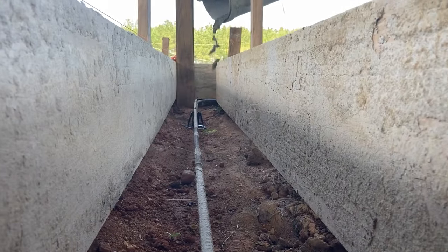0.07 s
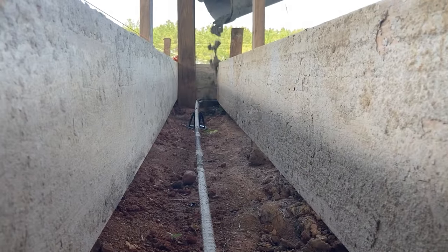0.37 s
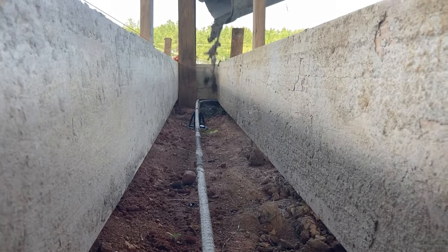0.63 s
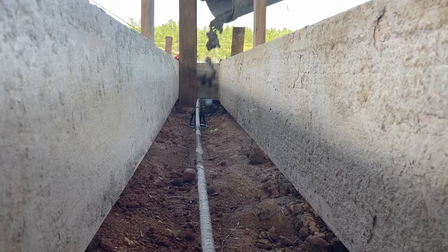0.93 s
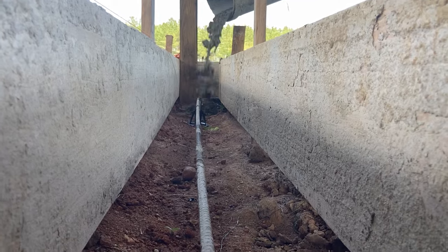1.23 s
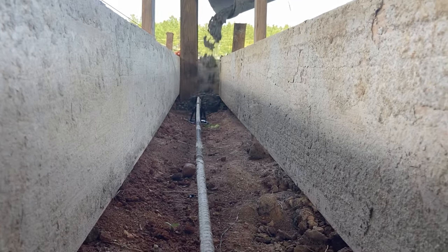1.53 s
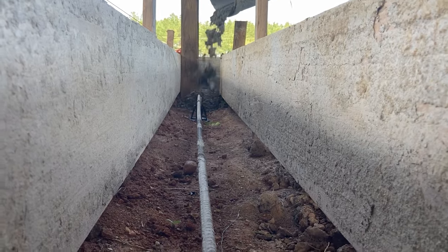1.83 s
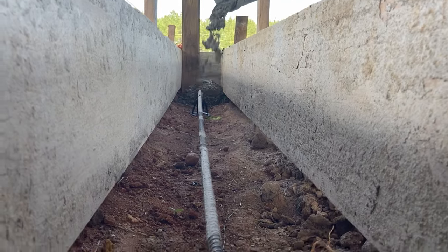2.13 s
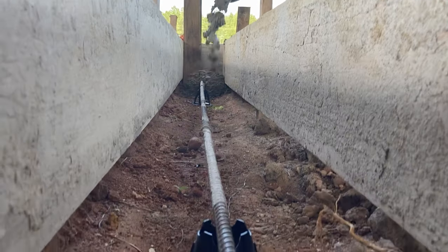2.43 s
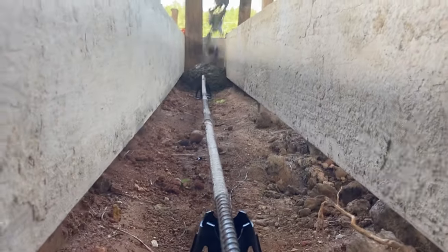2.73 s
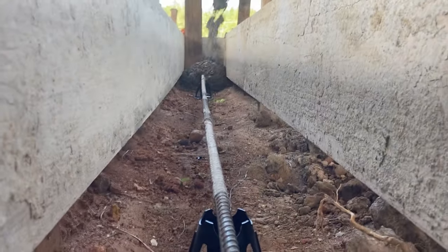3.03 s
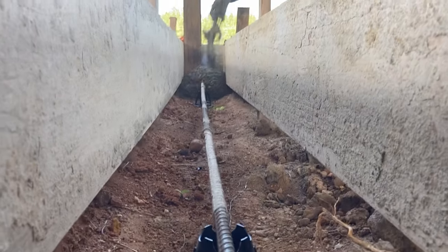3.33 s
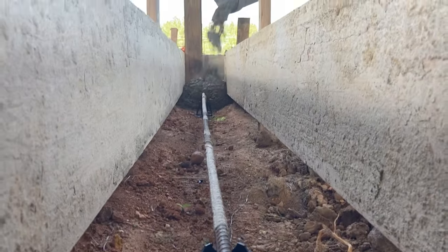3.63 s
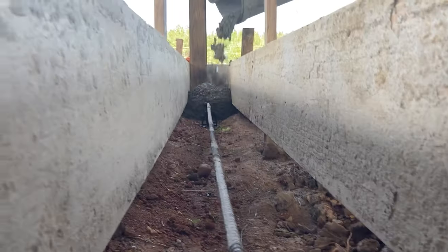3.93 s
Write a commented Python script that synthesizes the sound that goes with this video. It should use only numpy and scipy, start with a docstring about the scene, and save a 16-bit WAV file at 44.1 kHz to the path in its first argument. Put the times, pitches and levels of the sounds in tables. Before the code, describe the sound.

Lumps of wet concrete land with gritty splats over a steady diesel engine hum.

```python
"""Wet concrete drops from a chute into a narrow trench, a few metres from a phone held low in it.
From the start, two diesel engines drone nearby and the first big clods land with dull plops.
After half a second, lump follows lump, each a burst of gritty clicks and popping air pockets.
From one second on, stones now and then ring a steel rod.
Near the end come low thumps and rumble as the phone is handled and moved through the air."""
import sys
import numpy as np
from scipy import signal
from scipy.fft import rfft, irfft
from scipy.io import wavfile
from scipy.ndimage import uniform_filter1d

SR = 44100
rng = np.random.default_rng(int(sys.argv[2]) if len(sys.argv) > 2 else 0)


def master_out(mix):
    """Clip the mix to full scale and print it as 16-bit PCM to the path in sys.argv[1]."""
    frames = np.transpose(np.atleast_2d(mix))
    ceiling = np.clip(frames, -1, 1)
    pcm = np.round(ceiling * 32767).astype(np.int16)
    wavfile.write(sys.argv[1], SR, pcm)


N = 176400  # 4 seconds

# Lumps landing: t/s, level/dB, length/s
LUMPS = [(0.53, -36.5, 0.021), (0.58, -32, 0.01), (0.666, -34, 0.013), (0.75, -30, 0.016),
         (0.797, -35, 0.041), (0.904, -31, 0.025), (0.979, -30.5, 0.01), (1.029, -28.5, 0.056),
         (1.13, -30.5, 0.018), (1.149, -24.5, 0.013), (1.205, -31.5, 0.033), (1.272, -29.5, 0.036),
         (1.345, -26.5, 0.045), (1.426, -27.5, 0.01), (1.444, -27.5, 0.012), (1.505, -28, 0.028),
         (1.547, -31.5, 0.011), (1.587, -29, 0.0079), (1.654, -21.5, 0.0053), (1.701, -27, 0.0069),
         (1.743, -30.5, 0.042), (1.795, -27.5, 0.016), (1.862, -32, 0.013), (1.902, -26, 0.037),
         (2.026, -22.5, 0.0054), (2.095, -30.5, 0.02), (2.131, -32.5, 0.012), (2.162, -28, 0.023),
         (2.269, -29, 0.025), (2.352, -28, 0.012), (2.425, -29.5, 0.039), (2.507, -32, 0.021),
         (2.551, -30.5, 0.051), (2.615, -28, 0.025), (2.737, -26, 0.013), (2.767, -28.5, 0.011),
         (2.817, -24.5, 0.005), (2.856, -28.5, 0.0072), (2.893, -24.5, 0.012), (2.97, -24, 0.013),
         (3.027, -29.5, 0.018), (3.071, -23.5, 0.014), (3.123, -24.5, 0.009), (3.157, -26.5, 0.027),
         (3.242, -29, 0.024), (3.283, -27.5, 0.027), (3.38, -28, 0.033), (3.414, -29.5, 0.011),
         (3.465, -21.5, 0.011), (3.519, -29, 0.013), (3.544, -30, 0.021), (3.577, -32, 0.049),
         (3.613, -31.5, 0.017), (3.642, -30, 0.026), (3.681, -31.5, 0.015), (3.774, -26.5, 0.021),
         (3.865, -27, 0.011), (3.917, -30, 0.0093), (3.98, -32, 0.019)]
# Fine spatter between the lumps: t/s, level/dB
SPATTER = [(0, -44), (.5, -40.5), (1, -40), (1.5, -37), (2.3, -37.5), (2.6, -38), (3.6, -37), (4, -37.5)]


def flow(attack_s=0.005, release_s=0.0098, lump_boost_db=0.2):
    """How loud the landing concrete is at each moment: lumps stand out over fine spatter."""
    t = np.arange(N) / SR
    power = undb(curve(SPATTER)) ** 2
    for start, db, length in LUMPS:
        rise = np.clip((t - start) / attack_s + .5, 0, 1)
        fall = np.exp(-np.maximum(t - start - length / 2, 0) / (release_s + length / 2))
        power += (undb(db + lump_boost_db) * rise * fall) ** 2
    return np.sqrt(power)


def grit(per_s, spread_db=3):
    """Grains hit at random moments, making clicks of very uneven size."""
    sizes = undb(spread_db * np.minimum(rng.exponential(size=N), 4.5)) * rng.choice([-1, 1], N)
    return unit(sizes * (rng.random(N) < per_s / SR))


# Tone of the grit, heard directly and off the walls: f/Hz, relative level/dB
DIRECT_TONE = [(300, -39), (1000, -9), (3000, -6), (5500, -5.5), (7500, -1), (9000, 2), (10300, 1),
               (12000, -3), (15500, -9)]
ECHO_TONE = [(200, -13.5), (500, -5), (1000, -3.5), (2000, -3.5), (3400, 6.5), (5000, 3), (7500, -3.5),
             (9200, -44), (11500, 0.5), (15500, -22)]
# How much louder the wall echoes are on the left: f/Hz, left minus right/dB
ECHO_BALANCE = [(300, 20), (1000, -2), (3000, 2), (4500, 0), (15000, 0.5)]


def concrete(landing, spot_count=10, grains_per_s=22000):
    """Grit clicks down at many spots, each with its own quick echo between the trench walls."""
    t = np.arange(SR // 16) / SR
    # each spot's share of the flow swells and fades by itself
    shares = undb(6.5 * np.array([wander(per_s=16) for _ in range(spot_count)]))
    shares /= np.sqrt(np.sum(shares ** 2, axis=0))
    spots = np.array([grit(grains_per_s / spot_count) * landing * share for share in shares])
    walls = np.zeros((2, N))
    for spot in spots:
        echo = rng.standard_normal((2, len(t))) * fade(t, t60=0.026)
        walls += signal.oaconvolve(np.array([spot, spot]), echo, axes=1)[:, :N]
    lean = np.sqrt(gains(ECHO_BALANCE))
    walls = colour(irfft(rfft(walls) * np.array([lean, 1 / lean]), N), ECHO_TONE)
    direct = colour(spots.sum(axis=0), DIRECT_TONE)
    # the left microphone hears the grit later, with the wave upside down
    left = -delay(direct, lag_s=.000218)
    heard = undb(-2.5) * np.array([left, direct]) + undb(-3) * walls
    level = np.sqrt(np.mean(landing ** 2) * np.mean(heard ** 2))
    return patchy(heard) * level


def patchy(x, bands=22, swell_db=1.5):
    """Low and high bands swell on their own, so no two lumps sound alike."""
    place = np.interp(log_frequencies(), np.log([700, 14000]), [0, bands - 1])
    spectrum = rfft(x)
    parts = (irfft(spectrum * np.maximum(1 - abs(place - k), 0), N) for k in range(bands))
    return unit(sum(part * undb(swell_db * wander(per_s=35)) for part in parts))


# Big clods landing: t/s, level/dB, f/Hz, relative slap level/dB, delay on the left/s
CLODS = [(.1125, -15, 500, -19, 0.0036), (.2565, -27.5, 620, 5, -0.0015), (.2725, -13.5, 507, -16, -0.0007),
         (.296, -28.5, 470, -10, 0.0042), (.385, -26, 550, -9, -0.00065), (1.52, -25.5, 704, -11, -0.0016),
         (1.725, -27.5, 684, -11, -0.00073), (2.032, -24, 422, -3, -0.00074),
         (2.173, -27.5, 426, -14, .0003), (2.46, -25.5, 720, -15, -0.0002), (2.511, -18, 650, -9.5, 0.0023),
         (2.739, -27, 427, -14, .0004), (2.973, -26, 374, -12, 0.00066), (3.864, -28, 403, -10, 0.0026)]
# Hollow ring of the trench bottom: multiple of the clod's pitch, relative level/dB, fade time/s
HOLLOW = [(1, 4.5, 0.018), (1.04, -17.5, 0.12)]


def clods(slap_hz=1460, slap_width_hz=590, attack_s=0.0015, sag_s=0.002, boost_db=0.5):
    """Heavy clods land with a short plop and a wet slap on top; the walls scatter both."""
    out = np.zeros((2, N))
    t = np.arange(SR // 4) / SR
    edges_hz = [slap_hz - slap_width_hz / 2, slap_hz + slap_width_hz / 2]
    band = signal.butter(4, edges_hz, "band", fs=SR, output="sos")
    sagging = t + 0.56 * sag_s * (1 - np.exp(-t / sag_s))  # the pitch starts 56% high, then drops
    swell = 1 - np.exp(-(t / attack_s) ** 2)
    for start, db, hz, slap_db, lag_s in CLODS:
        plop = sum(undb(ring_db) * np.sin(2 * np.pi * hz * multiple * sagging) * fade(t, t60)
                   for multiple, ring_db, t60 in HOLLOW)
        slap = unit(signal.sosfilt(band, rng.standard_normal(len(t)))) * fade(t, t60=0.044)
        hit = undb(db + boost_db) * (plop + undb(slap_db) * slap) * swell
        echo = rng.standard_normal((2, len(t))) * t * fade(t, t60=0.053)
        walls = signal.fftconvolve(hit[None], echo / np.linalg.norm(echo), axes=1)[:, :len(t)]
        heard = np.array([delay(hit, lag_s), hit]) + undb(-4.5) * walls
        i = int(start * SR)
        out[:, i:i + len(t)] += heard[:, :N - i]
    return out * pan(db=2.5)


# Stones hitting the steel rod: t/s, click level/dB, ring level/dB
STONES = [(1.027, -13.5, -31.5), (1.13, -19, -30.5), (1.355, -29, -38), (1.654, -26, -54),
          (1.907, -21, -48), (2.028, -39, -40), (2.817, -25, -54), (3.127, -23, -54), (3.864, -25, -51)]
# The rod's ringing notes, in two matching lists: f/Hz and relative level/dB
ROD_HZ = [3523, 4699, 6282, 7332, 8330, 9670, 11594]
ROD_DB = [-13, -2.5, -11, -4, -7, -15, -10]


def rod(landing, patter_db=-50.5):
    """Stones click on a steel rod, and the grit behind them rattles it into a rough ring."""
    t = np.arange(SR) / SR
    notes = sum(undb(db) * np.sin(2 * np.pi * (hz * t + rng.random() + 0.14 * rng.random((2, 1))))
                for hz, db in zip(ROD_HZ, ROD_DB))
    ring = notes * fade(t, t60=0.27)
    out = np.zeros((2, N + SR))
    patter = grit(per_s=300) * landing  # keeps the rod ringing faintly
    out[:, :N] = undb(patter_db) * unit(signal.fftconvolve(patter[None], ring, axes=1)[:, :N])
    bright = signal.butter(2, 4000, "high", fs=SR, output="sos")
    for start, click_db, ring_db in STONES:
        click = signal.sosfilt(bright, rng.standard_normal((2, SR))) * fade(t, t60=0.012)
        rattle = rng.standard_normal(SR) * fade(t, t60=0.13)
        rough_ring = signal.fftconvolve(rattle[None] / np.linalg.norm(rattle), ring, axes=1)[:, :SR]
        i = int(start * SR)
        out[:, i:i + SR] += undb(click_db) * click + undb(ring_db) * rough_ring
    return out[:, :N]


# Squelch of bursting air pockets: t/s, level/dB
SQUELCH = [(0, -46), (1, -48), (1.6, -48.5), (2.3, -48), (2.6, -42), (3.2, -50), (3.6, -54), (4, -80)]


def squelch(landing, pockets_per_s=450, middle_hz=2684, pitch_rise=0.11):
    """Tiny air pockets burst with a short rising note, harder under each lump."""
    out = np.zeros((2, N + SR))
    for when, pitch, size, *phases in rng.random((int(pockets_per_s * N / SR), 5)):
        hz = middle_hz * 2 ** (0.494 * np.arcsin(2 * pitch - 1))
        life_s = 44 / hz  # about 44 vibrations
        t = np.arange(int(life_s * SR)) / SR
        cycles = hz * t * (1 + pitch_rise * t / life_s / 2) + np.array(phases)[:, None]
        i = int(when * N)
        out[:, i:i + len(t)] += undb(16 * size) * np.sin(2 * np.pi * cycles) * fade(t, life_s)
    return unit(out[:, :N] * np.sqrt(landing)) * undb(curve(SQUELCH)) * pan(db=5.0)


# Four-cylinder engine under changing load: t/s, speed/(turns per s), boost of its upper hum/dB
ENGINE_LOAD = [(0.0, 32.8, -1), (1.2, 32.8, .5), (1.9, 32, -1), (2.45, 33, 2), (3.05, 33.25, -1.8),
               (3.7, 32.7, -1.5), (4.0, 32.4, -0.5)]
# Each engine's exhaust notes, in two matching lists: multiple of the cycle rate and level/dB
FOUR_MULTIPLES = [4, 5, 6, 8, 9, 10, 11, 14, 16, 20]
FOUR_DB = [-40.5, -50, -60, -39, -44.5, -43.5, -49, -38.5, -39, -53.5]
SIX_MULTIPLES = [4, 5, 6, 8, 12, 36]
SIX_DB = [-46, -48, -41, -51, -46, -57.5]
# Rumble of burning fuel and clatter of moving parts: f/Hz, relative level/dB
RUMBLE_TONE = [(22, -55), (32, -25), (45, -5.5), (65, -6.5), (140, -5.5), (190, -8.5), (300, -6.5),
               (420, -13), (700, -24), (1500, -58)]
CLATTER_TONE = [(200, -6), (400, -5.5), (620, 2.5), (950, -0.5), (1600, 3), (2400, -1), (3500, -0.5),
                (5500, -5), (8000, -12), (11000, -57), (15500, -36)]


def engines(six_firing_hz=104.92, rumble_db=-40.5, clatter_db=-38):
    """A four- and a six-cylinder diesel hum over rumble; their clatter pulses as the cylinders fire."""
    speed, load_db = curve(ENGINE_LOAD), curve(ENGINE_LOAD, column=2)
    four, four_cycles = exhaust(speed / 2, FOUR_MULTIPLES, FOUR_DB, load_db)  # two turns per cycle
    six, six_cycles = exhaust(six_firing_hz / 6, SIX_MULTIPLES, SIX_DB)
    firing = np.cos(2 * np.pi * 4 * four_cycles) + np.cos(2 * np.pi * 6 * six_cycles)
    clatter = colour(rng.standard_normal((2, N)) * np.exp(0.038 * firing), CLATTER_TONE)
    rumble = colour(rng.standard_normal(N) + undb(-12) * rng.standard_normal((2, N)), RUMBLE_TONE)
    hum = four * pan(db=1.7) + six * pan(db=-2.5)
    return hum + undb(rumble_db) * rumble + undb(clatter_db) * clatter * pan(db=1.5)


def exhaust(cycle_hz, multiples, levels_db, load_db=0, flutter_db=0.37):
    """Gives an exhaust's wavering hum, whose upper notes swell with load, and its count of cycles."""
    cycles = np.cumsum(cycle_hz * (1 + 0.00095 * wander(per_s=4.96))) / SR
    hum = np.zeros(N)
    for multiple, db in zip(multiples, levels_db):
        level = undb(db + load_db * (multiple >= 14) + flutter_db * wander(per_s=8.84))
        hum += level * np.sin(2 * np.pi * (multiple * cycles + rng.random()))
    return np.sqrt(2) * hum, cycles


# Strength of the handling thumps: t/s, level/dB
THUMPS = [(0, -50), (2.8, -58), (3.12, -38), (3.35, -52), (3.44, -42), (3.49, -31), (3.7, -33), (3.82, -34),
          (4, -50)]
# Their deep tone: f/Hz, relative level/dB
THUMP_TONE = [(24, -42), (35, -11), (48, 1), (60, -7), (90, -18), (200, -29), (500, -71)]


def handling():
    """Low thumps and rumble from the phone being handled and moved through the air."""
    return colour(rng.standard_normal(N), THUMP_TONE) * undb(curve(THUMPS))


def undb(db):
    """Turn decibels into a number to multiply by."""
    return 10 ** (np.asarray(db) / 20)


def unit(x):
    """Scale to an average (rms) level of 1."""
    return x / np.sqrt(np.mean(x ** 2))


def curve(table, column=1):
    """Join a table's points in time with straight lines."""
    points = np.array(table, float)
    return np.interp(np.arange(N) / SR, points[:, 0], points[:, column])


def log_frequencies():
    """Every frequency in the sound, on a scale of pitch."""
    return np.log(np.arange(N // 2 + 1) * SR / N + 1)


def gains(table):
    """Turn a table of f/Hz, level/dB into a gain for every frequency."""
    hz, db = np.array(table, float).T
    return undb(np.interp(log_frequencies(), np.log(hz), db))


def colour(x, table):
    """Shape a sound's lows and highs, then scale it to level 1."""
    return unit(irfft(rfft(x) * gains(table), N))


def wander(per_s):
    """A smooth random drift, about 1 in size."""
    hold = int(SR / per_s)
    steps = np.repeat(rng.standard_normal(400), hold)[:N + 2 * hold]
    return unit(uniform_filter1d(uniform_filter1d(steps, hold), hold)[hold:N + hold])


def pan(db):
    """Left and right gains that make the left louder by db."""
    return undb(np.array([[db], [-db]]) / 2)


def fade(t, t60):
    """Die away by 60 dB every t60 seconds."""
    return np.exp(-np.log(1000) * t / t60)


def delay(x, lag_s):
    """The same sound, lag_s seconds later."""
    hz = np.arange(len(x) // 2 + 1) * SR / len(x)
    return irfft(rfft(x) * np.exp(-2j * np.pi * hz * lag_s), len(x))


def scene():
    """Add up the engines, the falling concrete and the handling thumps."""
    landing = flow()
    return engines() + concrete(landing) + squelch(landing) + clods() + rod(landing) + handling()


def record(dry):
    """The phone cuts off the highest treble, above 15900 Hz."""
    return signal.sosfilt(signal.ellip(10, .2, 80, 15900, fs=SR, output="sos"), dry)


dry = scene()
out = record(dry)
master_out(out)
```